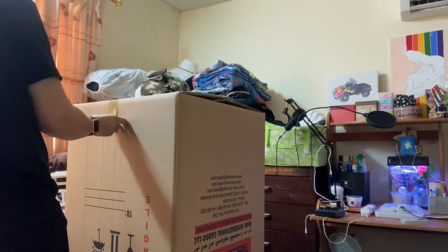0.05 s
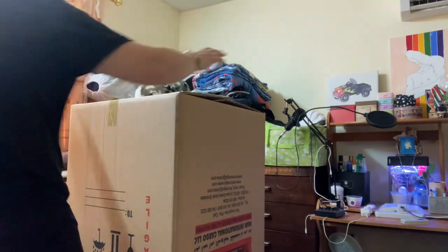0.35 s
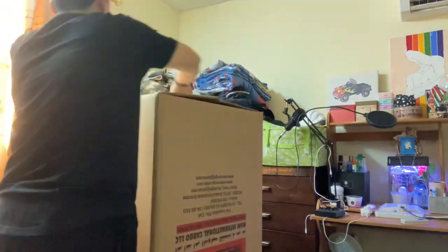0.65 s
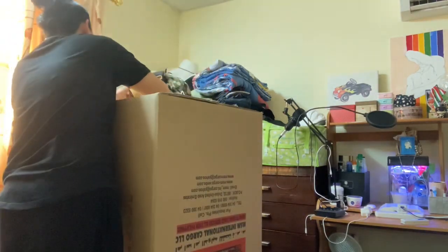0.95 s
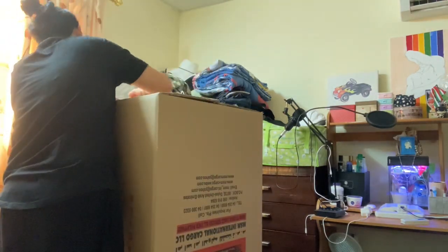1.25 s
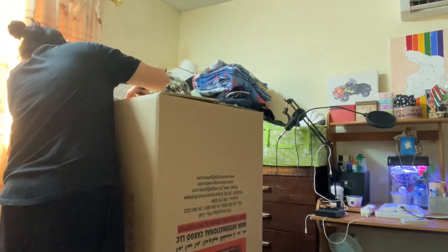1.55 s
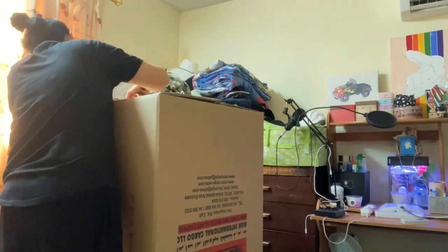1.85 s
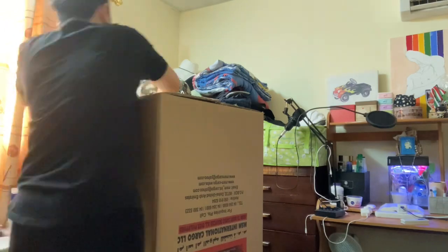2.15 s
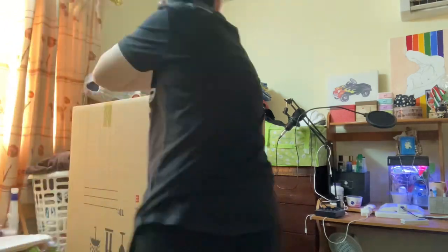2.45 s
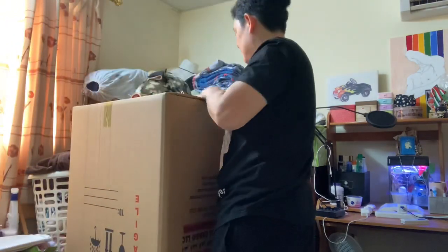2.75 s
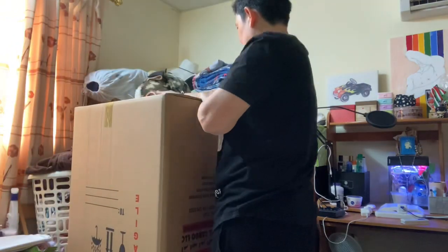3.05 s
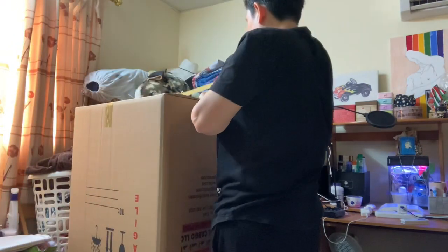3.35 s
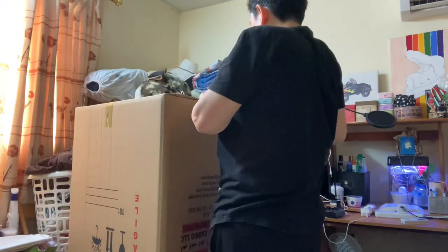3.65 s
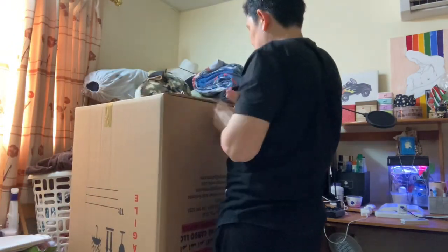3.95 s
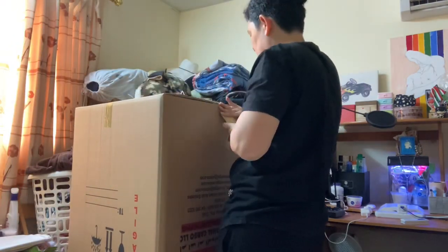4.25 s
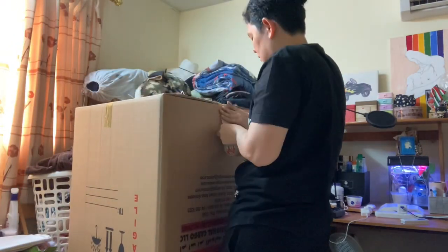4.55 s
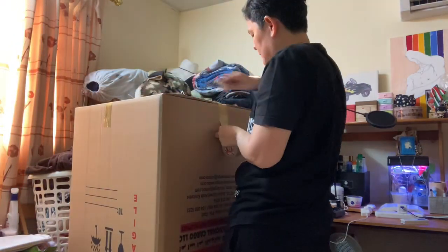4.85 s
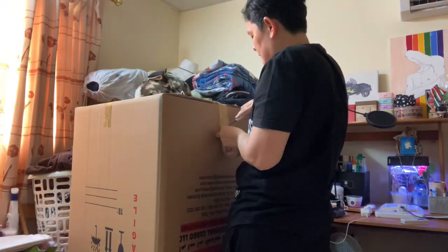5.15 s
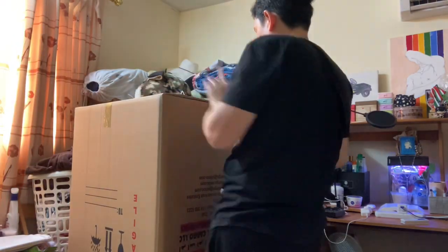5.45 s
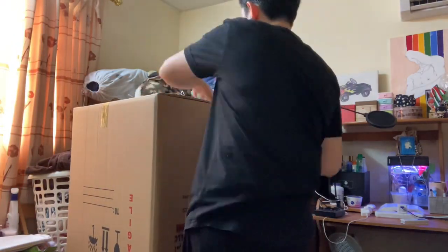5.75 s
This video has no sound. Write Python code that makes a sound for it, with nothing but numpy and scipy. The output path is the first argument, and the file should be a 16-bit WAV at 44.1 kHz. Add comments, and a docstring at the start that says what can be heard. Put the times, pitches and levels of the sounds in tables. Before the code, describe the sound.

Packing tape crackles and rips off a roll in one short pull while hands rub and thump a big hollow cardboard box in a small room.

```python
"""Taping a cardboard box shut

Over a low rumble in a small, furnished bedroom, hands rub the big hollow box and bump its walls and flaps.
The tape crackles in bursts of tiny fractures as its end is picked loose; fingers squeak on the film.
One long strip rips off the roll, glue threads breaking by the thousand, and is snapped and patted down."""
import sys
import numpy as np
from scipy import signal
from scipy.fft import rfft, irfft, next_fast_len
from scipy.io import wavfile
from scipy.ndimage import uniform_filter1d

SR = 44100
rng = np.random.default_rng(int(sys.argv[2]) if len(sys.argv) > 2 else 0)


def materialize(psi):
    """Save the field psi as 16-bit PCM at rate SR to the path in sys.argv[1].

    A 1-D psi becomes a single channel; in a 2-D psi each row is a channel.
    """
    bounded = np.clip(np.atleast_2d(psi).T, -1, 1)
    quanta = np.round(bounded * 32767).astype(np.int16)
    wavfile.write(sys.argv[1], SR, quanta)


N = 263718
TIME = np.arange(N) / SR
FREQ = np.fft.rfftfreq(N, 1 / SR)
BODY_HZ, TREBLE_HZ, AIR_HZ, CUTOFF_HZ = 1000, 4500, 10000, 15900  # band edges
PULL_START_S, PULL_STOP_S = 3.062, 3.455

# hands and sleeves sliding on cardboard: t/s, rasp level/dB, treble level/dB
RUB_LEVELS = [(0, -69.5, -91), (0.45, -69.5, -99), (0.54, -65, -55.5), (0.66, -59.5, -57), (0.81, -67, -63),
              (0.95, -69.5, -75.5), (1.37, -54.5, -56), (1.58, -73, -83), (1.85, -68.5, -74.5),
              (2.15, -63, -64.5), (2.55, -63.5, -60.5), (2.92, -69, -73), (2.98, -58.5, -57),
              (3.56, -80.5, -90.5), (3.93, -61, -62.5), (4.25, -69.5, -76), (4.7, -64.5, -63),
              (4.9, -73.5, -80), (4.98, -70, -70.5), (5.2, -65, -65), (5.28, -72, -84), (5.5, -65.5, -63.5),
              (5.8, -67.5, -70.5), (5.92, -76.5, -89)]
# hand lands on the box: t/s, boom level/dB, f/Hz, boom t60/s, scuff level/dB, treble re scuff/dB
HAND_PATS = [(0.122, -33, 164, 0.055, -53, 3), (0.297, -25, 143, 0.06, -54, 6),
             (0.479, -12.5, 127, 0.049, -56, -11), (0.489, -24, 191, 0.085, -33, -2),
             (0.529, -30, 215, 0.11, -39.5, -9), (0.795, -21.5, 140, 0.08, -30.5, -2),
             (1.622, -30.5, 181, 0.076, -55, 3), (1.781, -31.5, 130, 0.1, -68, -16),
             (2.303, -37, 131, 0.09, -48, -5.5), (3.705, -28.5, 136, 0.034, -55.5, -7),
             (4.008, -34, 150, 0.073, -38, 3.5), (4.029, -27.5, 131, 0.17, -52, -9),
             (4.773, -43, 228, 0.19, -57, -5), (5.331, -26.5, 151, 0.083, -41, -6),
             (5.417, -38, 198, 0.071, -51.5, -8), (5.557, -18, 135, 0.12, -47, -2.5),
             (5.659, -20, 156, 0.07, -48, -7), (5.73, -19, 171, 0.093, -46.5, -2.5),
             (5.948, -23.5, 196, 0.077, -39.5, -18.5), (5.962, -29, 282, 0.04, -42.5, -12)]
# glue holds, then lets go: t/s, surge/dB, preceding dip/dB
GLUE_JERKS = [(3.062, 5, 6), (3.111, 7, -1.5), (3.134, 7, 2), (3.161, 7, 9.5), (3.265, 4, 0), (3.322, 7, 3),
              (3.448, 0, 4.5), (3.475, 12.5, 7)]


def from_db(db):
    """Decibels to gain."""
    return 10 ** (np.asarray(db) / 20)


def in_time(rows):
    """Columns after t/s, interpolated per sample."""
    times, *columns = np.transpose(rows)
    return [np.interp(TIME, times, column) for column in columns]


def at_hz(points):
    """Spectrum table interpolated over log frequency."""
    hz, value = np.transpose(points)
    return np.interp(np.log(FREQ + 1), np.log(hz), value)


def butter(x, order, hz, kind):
    """Butterworth filter."""
    return signal.sosfilt(signal.butter(order, hz, kind, fs=SR, output="sos"), x)


def rms_one(x):
    """Scale to unit power."""
    return x / np.sqrt(np.mean(x ** 2) + 1e-20)


def band(x, low_hz, high_hz, order=4):
    """Band-pass at unit power."""
    return rms_one(butter(x, order, [low_hz, high_hz], "band"))


def steady_band(x, low_hz, high_hz):
    """Band-pass with power levelled over 20 ms; finer grain stays."""
    x = band(x, low_hz, high_hz)
    power = uniform_filter1d(np.mean(x ** 2, axis=0), size=882)
    return x / np.sqrt(np.abs(power) + 1e-9)


def resonance(x, hz, width_hz):
    """Two-pole resonator, unit peak gain."""
    r = np.exp(-np.pi * width_hz / SR)
    poles = [1, -2 * r * np.cos(2 * np.pi * hz / SR), r * r]
    return signal.lfilter(np.array([1, 0, -1]) * (1 - r * r) / 2, poles, x)


def bell(at_s, sigma_s):
    """Gaussian pulse in time."""
    return np.exp(-.5 * ((TIME - at_s) / sigma_s) ** 2)


def grains(per_s, spread_db):
    """Glue or fibre fractures: random clicks, mostly small, a few large."""
    sizes = from_db(spread_db * np.minimum(rng.exponential(1, N), 4)) * rng.choice([-1, 1], N)
    return sizes * (rng.random(N) < per_s / SR)


def scatter(clicks, t60_s, spots=3):
    """Mid and side of clicks arriving directly and by short paths that change as the hands move."""
    step = 2048
    t = np.arange(step) / SR
    blocks = np.pad(clicks, (0, -N % step)).reshape(-1, step)
    spectrum = 0
    for spot in range(spots):
        paths = rng.standard_normal((2, len(blocks), step)) * from_db(-60 * t / t60_s)
        paths /= np.sqrt(np.sum(paths ** 2, axis=-1, keepdims=True))
        paths[0, :, 0] += .35  # direct path
        from_spot = blocks * (np.arange(step) % spots == spot)
        spectrum = spectrum + rfft(from_spot, 2 * step) * rfft(paths, 2 * step)
    heard = irfft(spectrum)
    heard[:, 1:, :step] += heard[:, :-1, step:]  # overlap-add
    return heard[:, :, :step].reshape(2, -1)[:, :N]


def coloured(mid_side, colour):
    """Unit-power stereo shaped by a spectrum; narrow bass, wide treble."""
    # left-right likeness: f/Hz, correlation
    correlation = [(60, 0.97), (130, 0.76), (300, 0.35), (600, 0.1), (1400, 0.089), (3000, 0.03),
                   (8000, .05), (15000, .1)]
    size = next_fast_len(N, real=True)
    grid_hz = np.fft.rfftfreq(size, 1 / SR)
    alike = np.interp(grid_hz, FREQ, at_hz(correlation))
    mid, side = rfft(mid_side, size) * np.interp(grid_hz, FREQ, from_db(at_hz(colour)))
    stereo = np.sqrt(1 + alike) * mid + np.sqrt(1 - alike) * side * [[1], [-1]]
    return rms_one(irfft(stereo, size)[:, :N])


def room_rumble():
    """Steady low noise, slightly left."""
    # rumble spectrum: f/Hz, level/dB
    colour = [(15, -20.5), (25, -7.5), (195, -1.5), (429, -13), (506, -13), (642, -17.5), (893, -18.5),
              (1110, -25.5), (2000, -34.5), (2600, -50), (4400, -120)]
    return from_db(-52.5) * coloured(rng.standard_normal((2, N)), colour) * from_db([[.8], [-.8]])


def bedroom(x, t60_s, lowpass_hz):
    """Short, dull reverberation between bedding and curtains."""
    t = np.arange(SR // 2) / SR
    tail = rng.standard_normal((2, len(t))) * from_db(-60 * t / t60_s) * (t > .008)
    tail /= np.sqrt(np.sum(tail ** 2, axis=1, keepdims=True))
    return signal.fftconvolve(x, butter(tail, 1, lowpass_hz, "low"), axes=-1)[:, :N]


def rubbing():
    """Skin and cloth drag over cardboard fibres: a faint rustle."""
    # rustle spectrum: f/Hz, level/dB
    colour = [(180, -30), (320, -4.5), (520, 0.5), (1100, -10), (1700, -7.5), (4000, -15.5), (6600, -20),
              (9200, -20.5), (13500, -27.5), (15000, -23.5), (16000, -30.5)]
    rasp_db, treble_db = in_time(RUB_LEVELS)
    fibres = grains(per_s=8000, spread_db=3.5) + from_db(2.5) * grains(per_s=80, spread_db=5)
    texture = coloured(scatter(fibres, t60_s=0.063, spots=1), colour)
    rasp = from_db(rasp_db + 1) * band(texture, 480, TREBLE_HZ, order=2)
    return rasp + from_db(treble_db) * band(texture, TREBLE_HZ, CUTOFF_HZ)


def struck_panel(hits, modes, contact_s):
    """A soft hand pushes a panel; its damped modes build up over the contact time."""
    out = np.zeros((2, N))
    for at_s, db, hz, t60_s in hits:
        near = slice(int(at_s * SR), int((at_s + .4) * SR))
        t = np.maximum(TIME[near] - at_s, 0)
        push = 1 - np.exp(-(t / contact_s) ** 2)
        for ratio, mode_db, t60_share in modes:
            jitter_db, detune, skew = rng.standard_normal(3)
            phase = 2 * np.pi * hz * ratio * (1 + 0.032 * detune) * t + 0.27 * skew * np.array([[1], [-1]])
            level_db = db + mode_db + jitter_db - 60 * t / (t60_s * t60_share)
            out[:, near] += push * from_db(level_db) * np.sin(phase)
    return out


def box_bumps():
    """Hollow walls boom, stiff flaps knock; slightly left."""
    # modes of a wall and the air behind it: f/pitch, level/dB, t60 share
    wall_modes = [(.75, -14, 0.99), (1, 0.5, 0.87), (1.25, -3.5, 0.62), (1.7, -7, 0.52)]
    # flap modes: f/pitch, level/dB, t60 share
    flap_modes = [(0.621, -8.5, 1), (1.002, 8.5, 1), (1.37, -3, 1), (1.85, -2, 1), (2.401, -0.5, 0.54)]
    # knocks on the flaps: t/s, level/dB, f/Hz, t60/s
    flap_hits = [(0.496, -35, 574, 0.1), (0.527, -20.5, 418, 0.025), (0.535, -26, 335, 0.06),
                 (0.797, -24, 596, 0.054), (0.811, -27, 500, 0.052), (0.827, -33.5, 530, 0.052),
                 (3.705, -42.5, 449, 0.076), (4.015, -30.5, 336, .04), (5.346, -23.5, 492, 0.042),
                 (5.372, -44, 508, 0.068), (5.417, -35, 341, 0.08), (5.556, -35, 510, 0.04),
                 (5.662, -27.5, 850, 0.014)]
    booms = from_db(4.5) * struck_panel([pat[:4] for pat in HAND_PATS], wall_modes, contact_s=0.0047)
    knocks = from_db(-2.5) * struck_panel(flap_hits, flap_modes, contact_s=0.0005)
    radiated = butter(booms + knocks + 1e-18, 2, 80, "high")  # a box radiates little deep bass
    return radiated * from_db([[.7], [-.7]])


def finger_squeaks():
    """Skin sticks and slips on the film: short, unsteady glides."""
    # one list per squeak: t/s, f/Hz, level/dB
    glides = [
        [(3.715, 490, -75), (3.727, 504, -32.5), (3.738, 518, -34.5), (3.752, 549, -32), (3.762, 557, -44),
         (3.78, 550, -77)],
        [(4.592, 1480, -80), (4.606, 1440, -48), (4.618, 1370, -47), (4.628, 1310, -53), (4.642, 1280, -80)],
    ]
    out = np.zeros(N)
    for glide in glides:
        hz, db = in_time(glide)
        waver, grip = band(rng.standard_normal((2, N)), 30, 160, order=2)
        phase = 2 * np.pi * np.cumsum(hz * (1 + .035 * waver)) / SR
        touching = (TIME > glide[0][0]) & (TIME < glide[-1][0])
        out += touching * from_db(db + 2 * grip) * (np.sin(phase) + from_db(-35) * np.sin(2 * phase))
    return out


def scuff_bursts(lag_s=0.0043, swell_s=0.037, fall_s=0.097):
    """Skin scuffs the box at each pat; duller scuffs have more body."""
    return [(at_s + lag_s, db, 10 - .3 * treble_db, treble_db, swell_s, fall_s)
            for at_s, *_, db, treble_db in HAND_PATS]


def scrape_bursts(treble_db=-21, swell_s=0.047, fall_s=0.063):
    """Fingertips scrape briefly over bare cardboard."""
    # scrapes: t/s, level/dB, relative body/dB
    scrapes = [(0.437, -48.5, -5), (0.723, -51.5, 2), (0.828, -40.5, 12), (2.518, -46.5, -6),
               (2.724, -53, 12.5), (2.797, -60.5, 16.5), (4.697, -53, 3), (4.805, -54.5, 17),
               (5.655, -48.5, 5)]
    return [(at_s, db, body_db, treble_db, swell_s, fall_s) for at_s, db, body_db in scrapes]


def tape_bursts(crinkles_per_s=6, crinkle_t60_s=0.069, swell_share=0.63):
    """Tape is picked, stretched and pressed; faint crinkles between follow the rubbing level."""
    # tape crackles: t/s, level/dB, relative treble/dB, fall t60/s
    picks = [(0.019, -56.5, 7, .08), (0.237, -50.5, 5.5, 0.071), (0.345, -53, 1, 0.073),
             (0.761, -46.5, 1, 0.023), (1.031, -46.5, 9, 0.068), (1.235, -31.5, 3.5, 0.06),
             (1.281, -26, 0, 0.07), (1.3232, -26.5, -3, 0.07), (1.381, -37, -4.5, 0.07),
             (1.421, -34.5, -4, 0.034), (1.438, -33, -5, 0.053), (1.507, -38.5, 1.5, 0.08),
             (1.911, -57, -1, 0.044), (1.971, -54.5, -3.5, 0.12), (2.058, -55, 0.5, 0.12),
             (2.185, -48.5, 3, .11), (2.243, -47, 1, 0.063), (2.342, -48.5, 2.5, 0.026),
             (2.399, -54, 8, 0.037), (2.445, -49, 7, 0.056), (2.463, -44, -2.5, 0.045),
             (2.603, -53, -1, 0.2), (2.65, -49, 0, 0.062), (2.808, -56, 3, 0.086),
             (2.869, -46.5, -1.5, 0.12), (3.028, -41.5, -2, 0.1), (3.62, -28, -4, 0.061),
             (3.737, -30, -4, .066), (3.788, -36.5, 5, 0.057), (4.089, -21.5, 1, 0.062),
             (4.139, -44, 6.5, .065), (4.291, -44.5, 3.5, 0.058), (4.443, -57, -3.5, 0.074),
             (4.572, -43.5, 1, 0.069), (4.609, -49.5, -2.5, 0.16), (4.648, -41, -3, 0.063),
             (4.748, -59.5, 6.5, 0.066), (4.83, -47, -2, 0.099), (5.035, -53.5, 1, 0.055),
             (5.117, -45.5, 10, 0.062), (5.219, -52.5, 6.5, .075), (5.836, -57, -3.5, 0.087)]
    rub_db, rub_treble_db = in_time(RUB_LEVELS)
    jitter, chance = rng.random((100, 2)).T
    times = (np.arange(len(jitter)) + jitter) / crinkles_per_s
    levels = np.interp(times, TIME, rub_db) + 3.5 - 0.5 * np.log(np.maximum(chance, .02))
    trebles = np.interp(times, TIME, rub_treble_db - rub_db) + 5
    crinkles = [(at_s, db, treble_db, crinkle_t60_s)
                for at_s, db, treble_db in zip(times, levels, trebles) if at_s < TIME[-1]]
    # the cardboard body follows a stronger crackle only in part
    return [(at_s, db, -3.5 - 0.24 * (db + 40), treble_db, swell_share * fall_s, fall_s)
            for at_s, db, treble_db, fall_s in picks + crinkles]


def crackles(bursts):
    """Each burst is an avalanche of fractures that swells and dies in five bands."""
    # fracture spectrum: f/Hz, level/dB
    colour = [(120, -39), (200, 5), (416, 0), (509, 4), (735, -4.5), (1250, -10), (1480, -8), (1650, -11),
              (2960, -13), (3310, -13), (5840, -26.5), (9930, -20.5), (11300, -19), (13600, -5.5),
              (16000, -22.5)]
    # how openly the tape faces the listener past body and box: t/s, air-band gain/dB
    facing = [(0, 1.5), (1.5, -2), (2.5, -8.5), (3.8, -6.5), (4.05, 4.5), (4.65, 6.5), (5.2, -2),
              (5.9, -2.5)]
    texture = coloured(scatter(grains(per_s=3500, spread_db=3.5), t60_s=0.039), colour)
    edges_hz = [270, BODY_HZ, 2 * BODY_HZ, TREBLE_HZ, AIR_HZ, CUTOFF_HZ]
    power = np.zeros((len(edges_hz) - 1, N))
    for at_s, db, body_db, treble_db, swell_s, fall_s in bursts:  # body, treble re db; times as t60
        near = slice(max(int((at_s - .12) * SR), 0), int((at_s + .2) * SR))
        air_db = 1.3 * treble_db - 6 + np.interp(at_s, *np.transpose(facing))
        zones_db = [0.98 * body_db - 2, 0.12 * body_db - 3, -.14 * body_db - 2, treble_db - 0.5, air_db]
        for zone, zone_db in enumerate(zones_db):
            t = TIME[near] - at_s - .0006 + zone * 0.00083  # highs lead and die first
            shape_db = -60 * np.maximum(-t / swell_s, t / (fall_s * (1.12 - 0.023 * zone)))
            power[zone, near] += from_db(db + zone_db + shape_db) ** 2
    return sum(gain * steady_band(texture, low_hz, high_hz)
               for gain, low_hz, high_hz in zip(np.sqrt(power), edges_hz, edges_hz[1:]))


def pull_db(t, start_db, sag_db_per_s, attack_t60_s=0.066, release_t60_s=0.088):
    """Pull envelope: the strip gets up to speed, runs with a sagging level, stops."""
    attack = np.maximum(PULL_START_S - t, 0) / attack_t60_s
    release = np.maximum(t - PULL_STOP_S, 0) / release_t60_s
    return start_db - sag_db_per_s * (t - PULL_START_S) - 60 * (attack + release)


def pull_rasp_db(t):
    """Rasp level, sagging as the arm slows."""
    return pull_db(t, start_db=-26.5, sag_db_per_s=0.5)


def snaps(lead_s=0.0019):
    """Single large fractures of film or glue: bright clicks, one just ahead of each jerk."""
    # hard snaps of the film: t/s, level/dB
    film_snaps = [(2.446, -27), (2.466, -31), (4.0868, -25), (4.573, -36), (4.595, -13.5), (5.245, -22.5),
                  (5.454, -31)]
    glue_snaps = [(at_s - lead_s, pull_rasp_db(at_s) + surge_db - 1) for at_s, surge_db, _ in GLUE_JERKS]
    clicks = np.zeros(N)
    for at_s, db in film_snaps + glue_snaps:
        clicks[int(at_s * SR)] = from_db(db)
    mid, side = scatter(clicks, t60_s=.018, spots=1)
    softened = signal.lfilter([1], [1, -.3], np.array([mid + side, mid - side]) + 1e-18)
    return from_db(-3.5) * butter(softened, 1, 600, "high")


def long_pull():
    """Glue threads snap by the thousand; the roll rings and the strip shakes the box it is stuck to."""
    # resonances of roll and taut strip: f/Hz, width/Hz, level/dB
    roll_modes = [(700, 70, -5), (1280, 100, 0), (1610, 310, -0.5), (2160, 96, -3.5), (3820, 300, -29),
                  (9000, 1500, -15.5)]
    # ripping spectrum: f/Hz, level/dB
    colour = [(41, -46.5), (70, -14.5), (129, 0.5), (199, 3), (280, 12), (635, 8.5), (744, 7.5), (1250, -4),
              (2660, -5.5), (4090, -5.5), (5890, -8), (8660, -3), (11400, -7.5), (14000, -6),
              (16000, -18.5)]
    threads = scatter(grains(per_s=3400, spread_db=3), t60_s=0.046)
    ringing = sum(from_db(db) * resonance(threads, hz, width_hz) for hz, width_hz, db in roll_modes)
    texture = coloured(threads + ringing, colour)
    jerk_db = sum(surge_db * bell(at_s, sigma_s=0.004) - dip_db * bell(at_s - 0.01, sigma_s=0.0051)
                  for at_s, surge_db, dip_db in GLUE_JERKS)
    # a longer strip has less body and shakes the box less
    body_db = -7 - 10.5 * (TIME - PULL_START_S)
    boom_db = pull_db(TIME, start_db=-36, sag_db_per_s=52)
    boom = from_db(boom_db) * steady_band(texture, 64, 175)
    body = from_db(body_db) * steady_band(texture, 205, BODY_HZ)
    rasp = steady_band(texture, BODY_HZ, TREBLE_HZ)
    treble = from_db(-4) * steady_band(texture, TREBLE_HZ, CUTOFF_HZ)
    return from_db(pull_rasp_db(TIME) + jerk_db) * (body + rasp + treble) + boom


def scene():
    """Box, tape and hands in the room, over its rumble."""
    taping = box_bumps() + crackles(tape_bursts() + scuff_bursts() + scrape_bursts())
    taping += long_pull() + snaps() + finger_squeaks()
    background = room_rumble() + rubbing()
    return background + taping + from_db(-23) * bedroom(taping, t60_s=0.15, lowpass_hz=2500)


def record(dry):
    """Narrow dip in the high treble, then a steep low-pass."""
    dipped = dry - .7 * resonance(dry, hz=11400, width_hz=750)
    return signal.sosfilt(signal.ellip(10, .1, 80, CUTOFF_HZ, fs=SR, output="sos"), dipped)


dry = scene()
out = record(dry)
materialize(out)
```